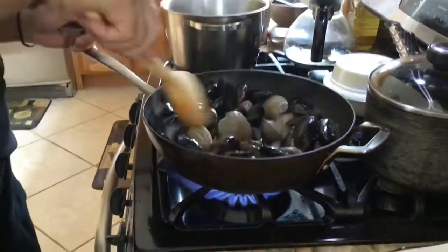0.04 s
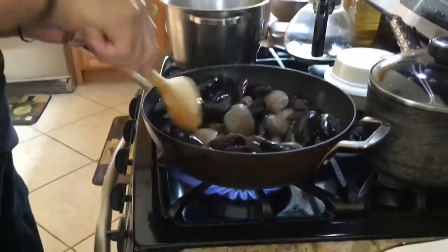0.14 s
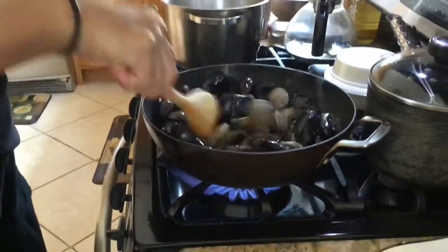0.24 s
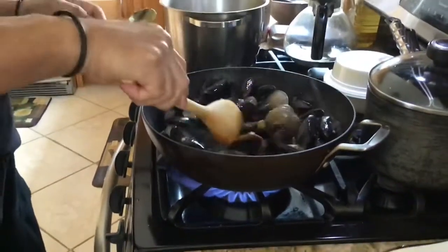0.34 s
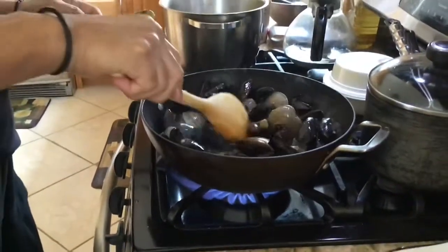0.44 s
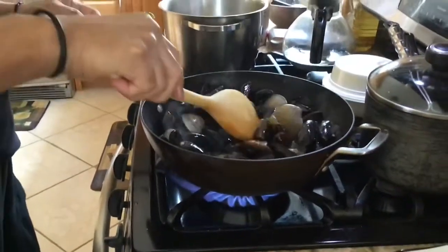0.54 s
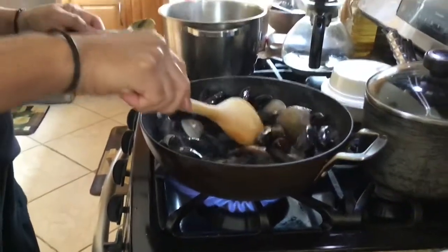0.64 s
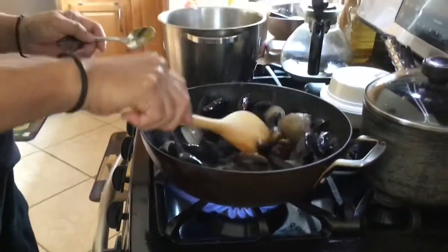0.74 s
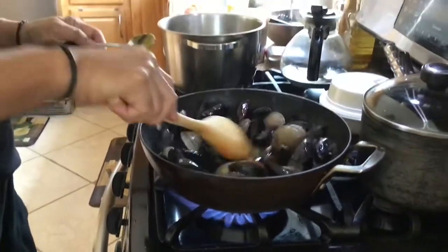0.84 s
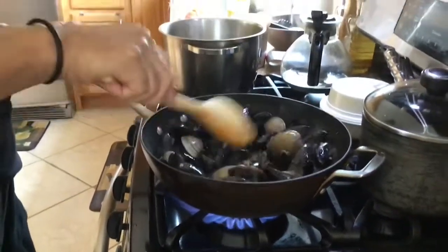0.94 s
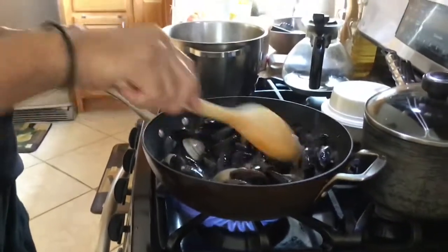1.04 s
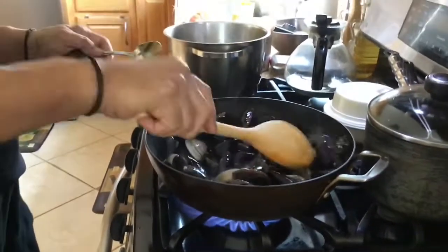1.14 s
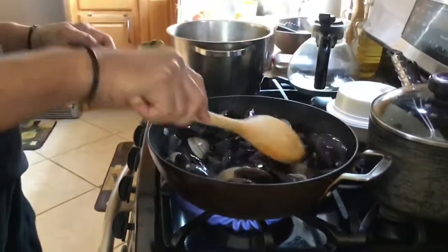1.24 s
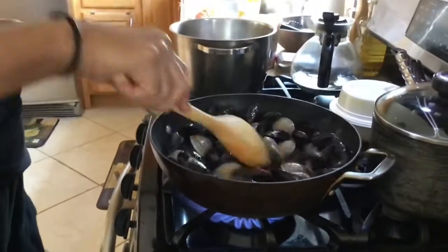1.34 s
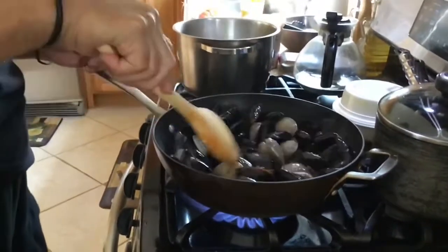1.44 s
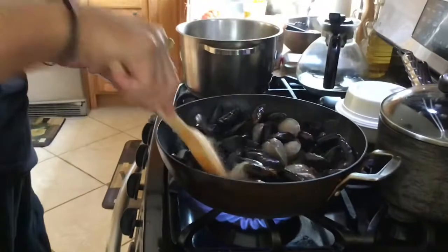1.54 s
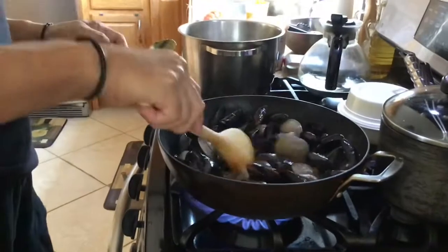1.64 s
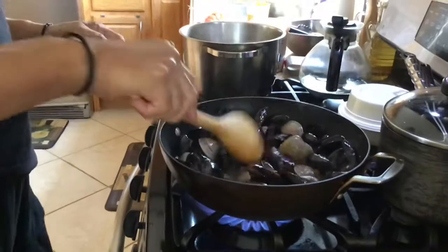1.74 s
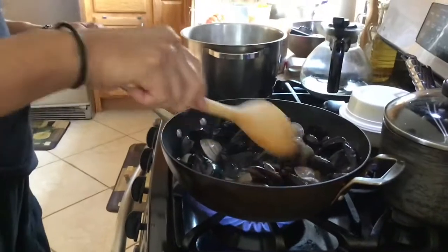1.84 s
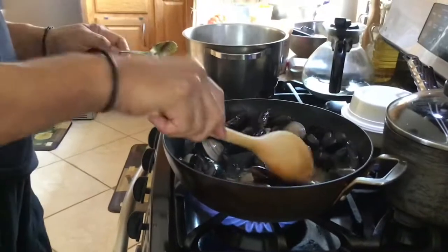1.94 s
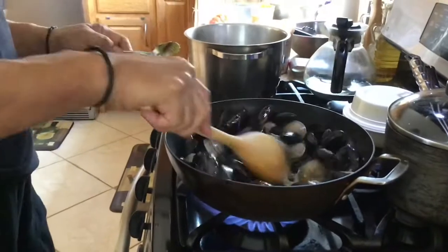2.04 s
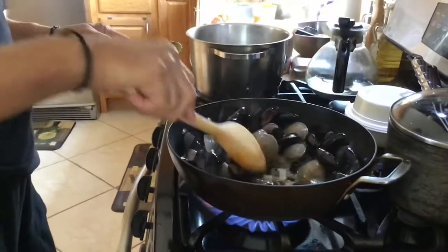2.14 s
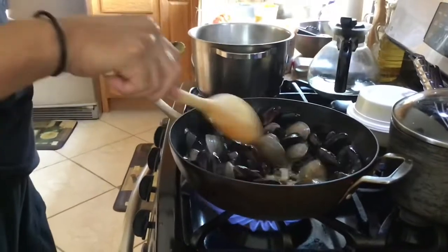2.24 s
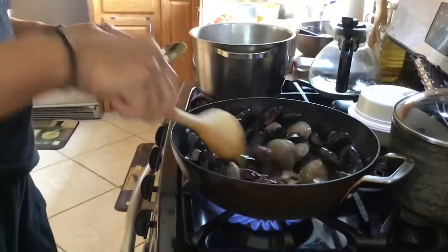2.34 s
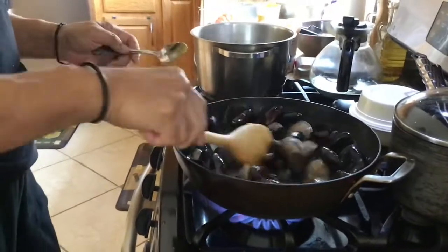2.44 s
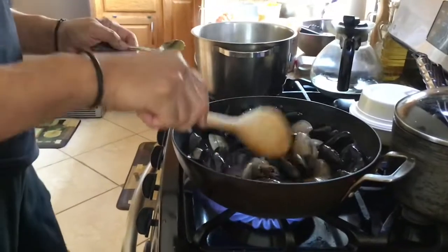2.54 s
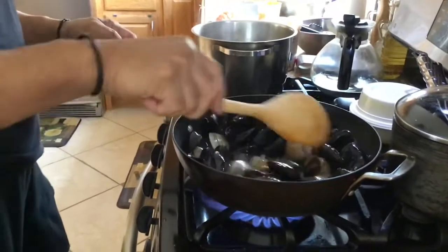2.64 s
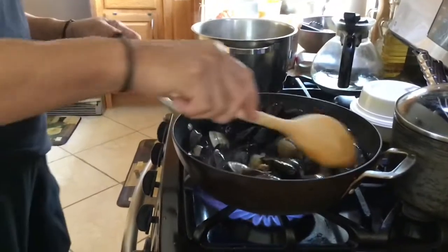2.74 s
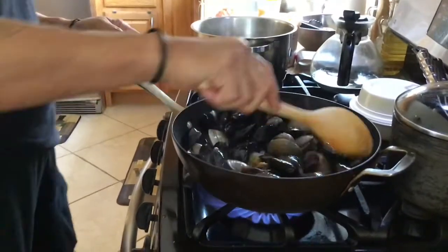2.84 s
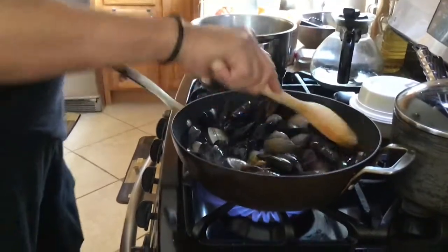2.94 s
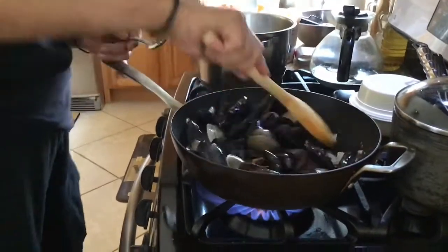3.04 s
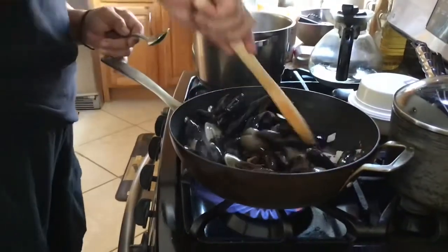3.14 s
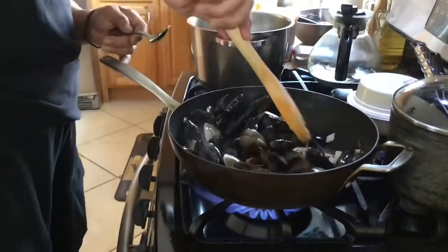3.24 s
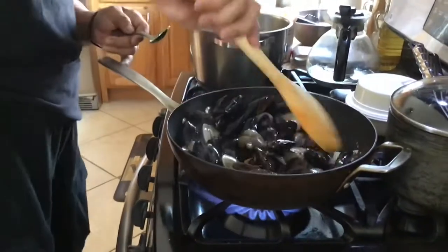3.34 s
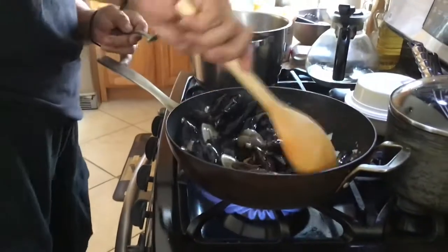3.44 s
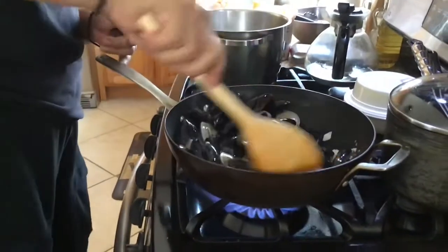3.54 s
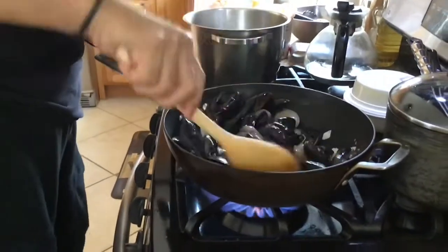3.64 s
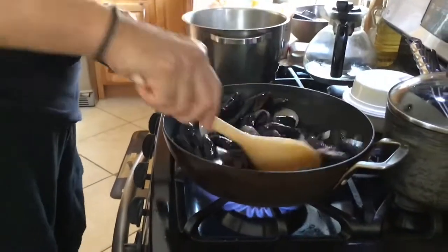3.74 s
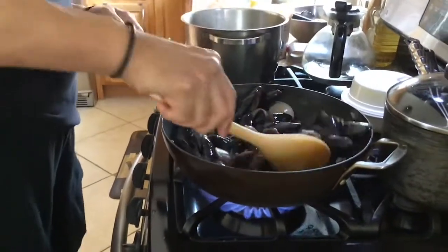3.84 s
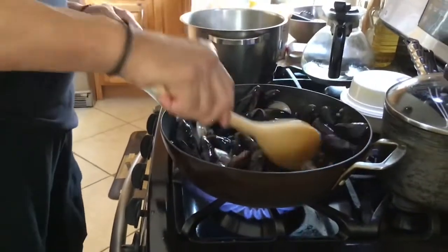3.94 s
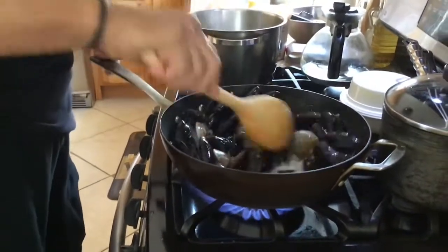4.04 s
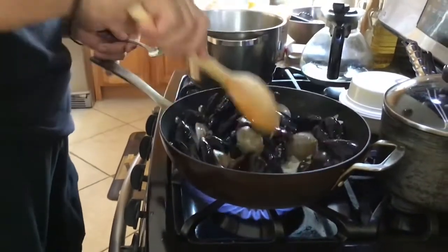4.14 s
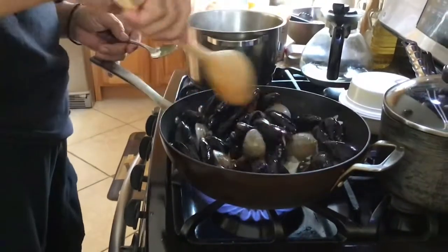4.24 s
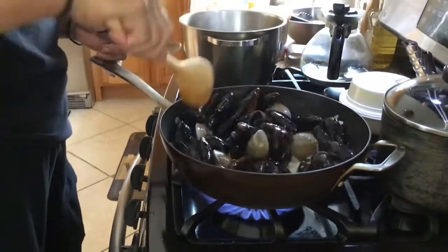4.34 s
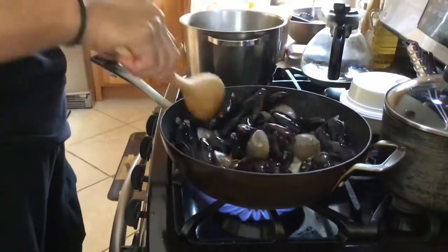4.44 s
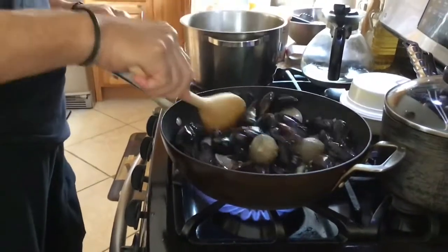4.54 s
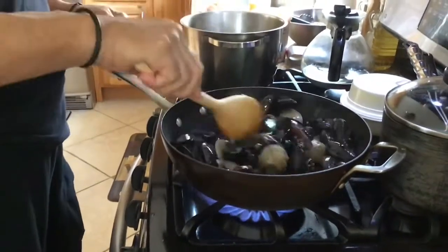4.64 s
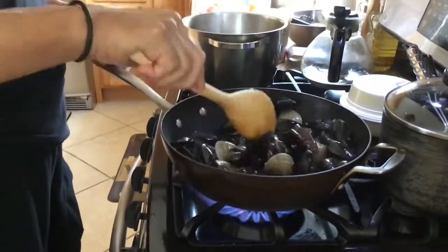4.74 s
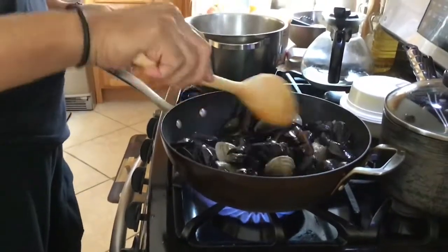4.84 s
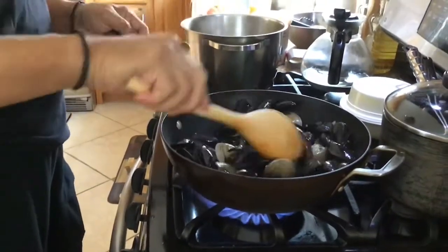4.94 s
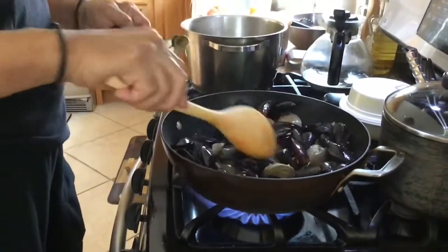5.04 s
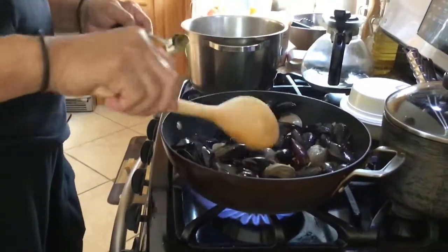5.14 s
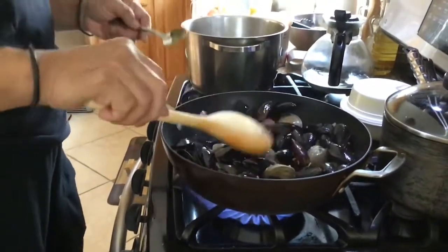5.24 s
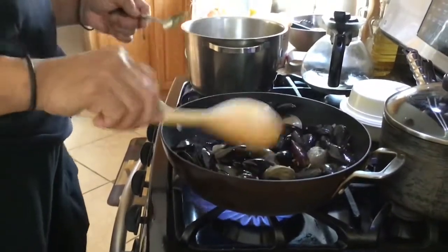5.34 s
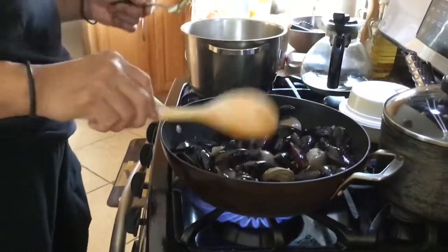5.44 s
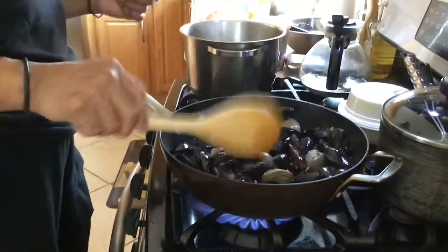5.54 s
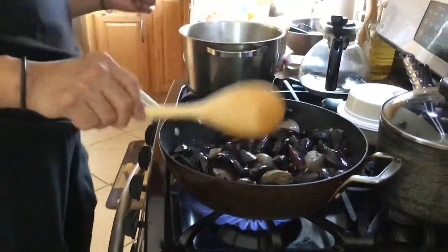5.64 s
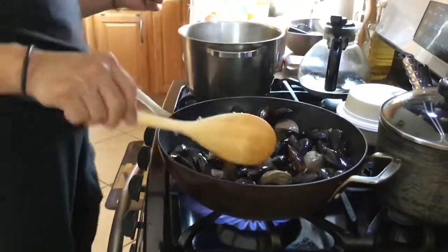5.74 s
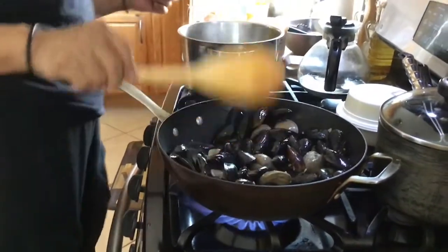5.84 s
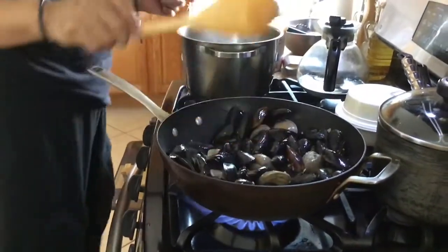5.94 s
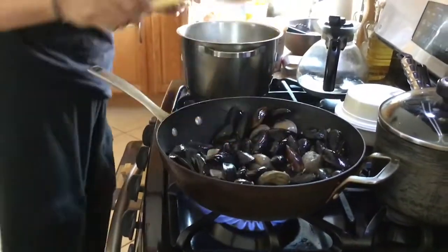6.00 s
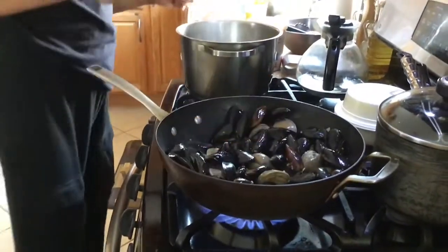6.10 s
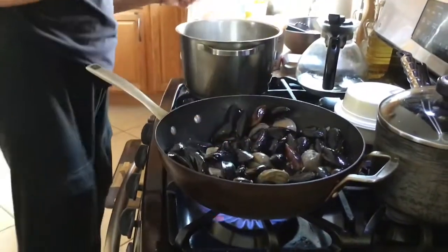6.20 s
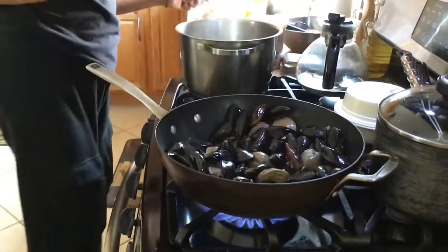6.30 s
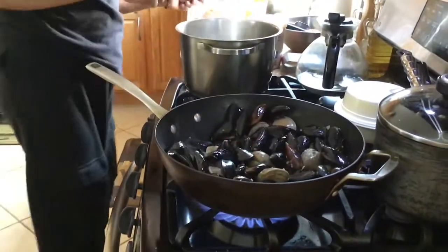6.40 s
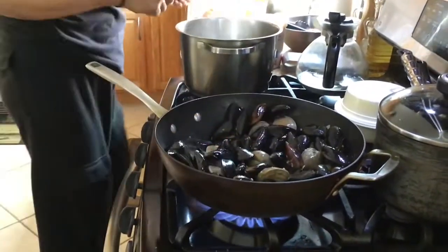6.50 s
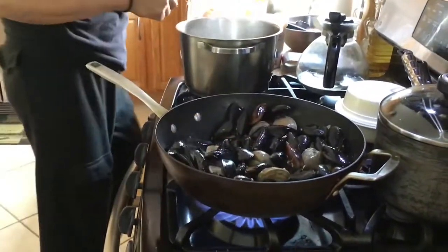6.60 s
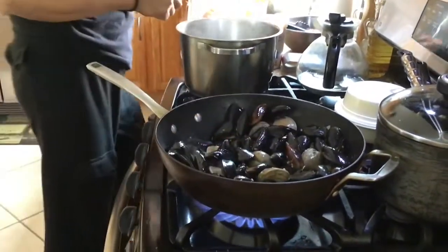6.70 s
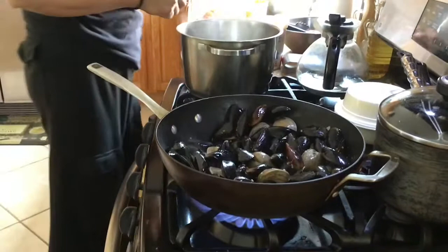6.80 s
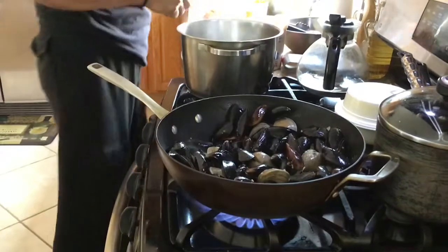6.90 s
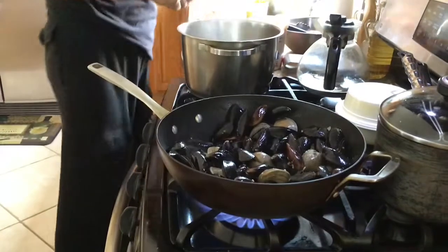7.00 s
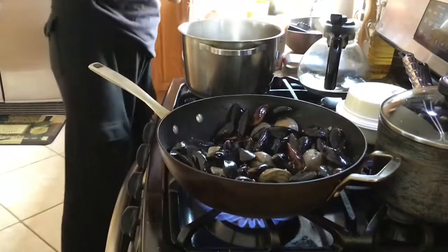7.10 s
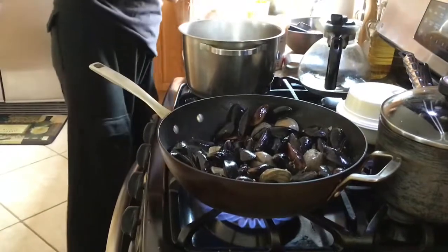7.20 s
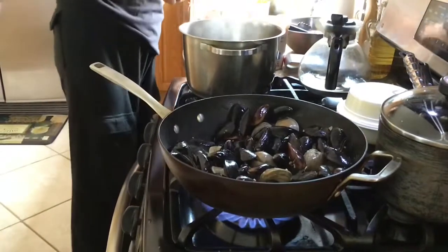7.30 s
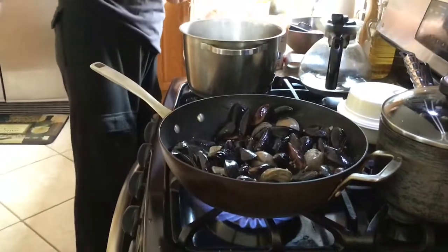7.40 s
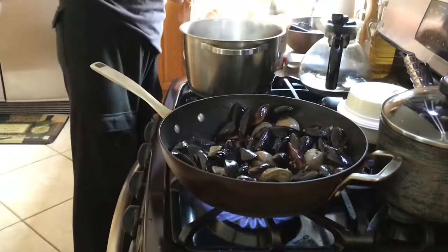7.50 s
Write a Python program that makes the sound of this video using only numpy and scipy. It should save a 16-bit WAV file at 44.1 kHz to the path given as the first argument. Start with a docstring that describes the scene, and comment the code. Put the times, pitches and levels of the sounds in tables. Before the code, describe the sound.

Shellfish are stirred in a deep skillet on a gas burner, heard close in mono in a small kitchen with a short echo. A fine, crackly sizzle, soft low flame rush and steady low hum last throughout. Stirring is already under way at 0 s: a busy clatter with a strong hollow pan knock near 0.2 s, brittle shell clicks and a dull thump, until about 0.4 s. Further strokes rattle the heap near 0.65, 1.05, 1.5, 1.9 and 2.3 s, with clear knocks at 1.1, 1.5 and 1.95. More scraping clatter comes around 2.9 and 3.5, then a lull, and strokes at 4.4 and 4.9. Sparser, sharper clacks follow at 5.1, 5.3 and 5.5, and a last hard clank at 5.7. The rattle dies away; from about 5.9 to 7.5 s only sizzle, flame and hum continue.

```python
"""Shellfish are stirred with a wooden spoon in a deep skillet on a gas burner, near a mono microphone.
From the start the juices sizzle (bursts of noise), the flame rushes (low noise) and an appliance hums
(steady tones). Over them, stroke by stroke, shells and spoon knock on the pan (ringing modes), shells click
on each other (short rings and splintery noise), the heap rattles (many small blows) and the pan thumps.
After a last hard knock the rattle dies away, and only sizzle, flame and hum go on."""
import sys
import numpy as np
from scipy import signal
from scipy.io import wavfile
from scipy.ndimage import uniform_filter1d

SR = 44100
rng = np.random.default_rng(int(sys.argv[2]) if len(sys.argv) > 2 else 0)


def wav_record(signal):
    """Record a signal, one row per channel, as 16-bit PCM in the file named by sys.argv[1]."""
    frames = np.transpose(np.atleast_2d(signal))
    bounded = np.clip(frames, -1, 1)
    # unit amplitude maps onto the largest positive 16-bit level
    quanta = np.round(bounded * 32767).astype(np.int16)
    wavfile.write(sys.argv[1], SR, quanta)


N = 333396  # length in samples

# upper ring of the skillet: (pitch [Hz], level [dB], time to fall by 60 dB [s])
UPPER_MODES = [(831, -9.5, 0.14), (905, -6.5, 0.029), (914, -6.5, 0.13), (947, -2, 0.063), (1073, -2, 0.08),
               (1094, -21, 0.2), (1149, 10.5, 0.036), (1233, -4.5, 0.018), (1468, -2.5, 0.056),
               (1580, -6, 0.058)]


def knocks():
    """Each blow rings the skillet, the upper ring first; then the heap settles back and damps it."""
    # shells or spoon on the pan: (time [s], peak of the low ring before damping [dB], pitch of the
    # struck spot [Hz], upper ring over the low ring [dB], damping, none if below 0 [dB])
    knock_rows = [(0.053, -20, 636, -5, 20), (0.082, -31, 606, 2, 2), (0.195, -6.5, 597, -5.5, 1.5),
                  (0.245, -27, 581, -16, 0), (0.28, -30, 651, -6, 5), (0.319, -28, 627, -4, 7),
                  (0.338, -19, 633, 5, 16), (0.37, -29.5, 576, 0, 5), (0.39, -24, 603, -6, 8),
                  (0.661, -31.5, 660, -3, 0), (0.743, -35.5, 644, 8, 0), (1.018, -30.5, 604, 3, 10),
                  (1.077, -11, 635, 0, 17), (1.109, -33, 563, 3, 5), (1.25, -28.5, 655, 5, 9),
                  (1.281, -22.5, 640, -13, 9), (1.505, -9.5, 594, -2, 2.5), (1.541, -24, 570, -8, -2),
                  (1.558, -27, 590, -10, 5), (1.885, -14.5, 700, -8, 23), (1.899, -25, 670, -8, 11),
                  (1.925, -17, 690, 0, 10), (1.962, -10.5, 565, -5, 1), (2.007, -20, 575, -4, 13),
                  (2.053, -26, 587, -15, 5), (2.082, -28.5, 549, -9, 8), (2.238, -29.5, 705, 2, -3),
                  (2.315, -27, 660, 4, 7), (2.328, -19, 606, -20, 6), (2.364, -24.5, 624, -8, -1),
                  (2.42, -31, 614, -13, 5), (2.535, -23, 664, -8, 5), (2.869, -31.5, 630, 6, 14),
                  (2.89, -24, 660, -15, 8), (2.944, -31.5, 657, 7, 5), (2.982, -23.5, 606, -21, -1),
                  (3.037, -22.5, 666, -8, 5), (3.4, -30.5, 643, 0, 0), (3.526, -22.5, 516, 3, 1),
                  (3.534, -20.5, 660, 0.5, 5), (3.584, -21.5, 624, 1, -0.5), (3.683, -29, 700, -1, 8),
                  (4.335, -41, 624, 11.5, 7), (4.414, -29.5, 644, 2, 0), (4.437, -18.5, 680, 0, 0.5),
                  (4.611, -22.5, 670, 0.5, 6), (4.851, -32, 660, -7, 13), (4.918, -30.5, 623, -2, -3),
                  (5.136, -29, 700, -1.5, 12), (5.3225, -16.5, 700, 2.5, 2), (5.501, -29.5, 649, -4, 0),
                  (5.68, -6, 603, -4, 19)]
    out = np.zeros(N)
    t = np.arange(SR // 3) / SR
    grip = 1 / (1 + np.exp((0.012 - t) / 0.0021))  # the heap grips after the first swell
    settled = (1 + t / 0.034) * grip  # then damps ever more
    for s, db, spot_hz, upper_db, damping_db in knock_rows:
        spot_db = 3 * rng.standard_normal((len(UPPER_MODES), 1))  # each blow wakes the modes differently
        upper = ring(UPPER_MODES, spot_db, gather_s=0.00297, rise_s=0.00053)
        rung = low_ring(spot_hz, focus_db=7.5) + gain_of(upper_db) * upper
        damped_db = db - max(damping_db, 0) * settled
        add(out, s - 0.0035, gain_of(damped_db) * rung)  # a little early, as the ring must swell
    return out


def low_ring(spot_hz, focus_db):
    """The low ring builds up slowly and favours modes near the struck spot's pitch."""
    # low ring of the skillet: (pitch [Hz], level [dB], time to fall by 60 dB [s])
    low_modes = [(484, -13, .12), (521, -10, .14), (545, -3, .2), (568, 0, .26), (588, -4, .18),
                 (606, -1, .24), (633, -3, .2), (648, 0, .28), (668, -1, .22), (683, -2, .22),
                 (719, -10, .1)]
    away = (np.array(low_modes)[:, :1] - spot_hz) / 100
    # focus_db is what a mode 100 Hz away loses
    return ring(low_modes, -focus_db * away ** 2, gather_s=0.00644, rise_s=0.0036)


def ring(modes, spot_db=0, gather_s=0, rise_s=0.00032, size=SR // 3):
    """Dying modes whose waves line up gather_s after the blow, so the ring swells and then beats apart."""
    hz, db, t60 = np.transpose(modes)[:, :, None]
    t = np.arange(size) / SR
    fading = gain_of(db + spot_db - 60 * t / t60)
    out = (fading * np.cos(2 * np.pi * hz * (t - gather_s))).sum(0)
    out *= 1 - np.exp(-(t / rise_s) ** 2)
    return out / abs(out).max()


def clicks():
    """Single shells snap against each other, each with a short bright burst."""
    # shell on shell: (time [s], level [dB], shell pitch [Hz], crack over the rest [dB], pitched share [0-1])
    click_rows = [(0.092, -19.5, 2330, -14, .4), (0.143, -22, 1650, -17, .3), (0.163, -18, 2380, -13, 0.37),
                  (0.1875, -22, 2830, -18, 0.47), (0.2086, -26, 2400, -15, 0.6),
                  (0.2618, -21, 1630, -17, 0.16), (0.3344, -17.5, 2880, -22, 0.55),
                  (0.3703, -20.5, 2330, -3, .5), (0.665, -27, 2500, -10, .3), (0.743, -24, 2380, -11, .3),
                  (1.025, -25, 2150, -15, .5), (1.0756, -14.5, 1580, -8.5, .2),
                  (1.1004, -28, 2150, -13, 0.6), (1.2414, -18, 2500, -24, .5),
                  (1.28, -19.5, 2280, -19, 0.33), (1.315, -27, 1520, -15, .3), (1.4491, -23, 2180, -17, .4),
                  (1.503, -16, 2340, -13, 0.44), (1.917, -23, 1660, -15, .4),
                  (1.9266, -20.5, 1900, 0.5, .1), (1.9565, -22, 1630, -25, .1), (1.985, -23, 1820, -25, .4),
                  (1.9962, -18, 1560, -19, 0.43), (2.2373, -26, 1600, -15, 0.3),
                  (2.761, -25, 2520, -16, .8), (2.846, -18, 2150, -12, 0.66),
                  (2.8667, -15.5, 2140, -9, 0.34), (2.9424, -21.5, 2470, -16, .5),
                  (2.9542, -21, 1770, -14, 0.53), (3.113, -25.5, 2400, -16, 0.7),
                  (3.1476, -27, 1590, -20, .7), (3.282, -27.5, 3210, -15, 0.7),
                  (3.5139, -22, 2220, -14, .3), (3.5246, -15.5, 2430, -20, 0.74),
                  (3.5336, -17, 2850, -18, 0.73), (3.802, -26, 2120, -14, .4), (4.023, -26, 1600, -15, 0.6),
                  (4.4134, -16, 2330, -17, 0.54), (4.435, -21.5, 3000, -10, .4),
                  (4.4646, -20.5, 2300, -15, 0.46), (4.597, -20, 2590, -16, 0.33),
                  (4.8519, -26, 1615, -20, .6), (4.8711, -21, 1620, -15, 0.5), (4.969, -26, 2300, -17, 0.5),
                  (5.002, -26, 1680, -18, 0.56), (5.1345, -17, 2290, -22, 0.65),
                  (5.3205, -10.5, 2490, -31, 0.78), (5.4986, -12.5, 2190, -30, .5),
                  (5.508, -16, 2250, -15, 0.35), (5.593, -20, 2010, -24, 0.56),
                  (5.6763, -7.5, 2580, -19, 0.4)]
    out = np.zeros(N)
    for s, db, hz, crack_db, pitched in click_rows:
        softness = 2.5 + max(-13.5 - db, 0) / 2.9  # quiet blows are softer
        hiss = rng.standard_normal(3000)
        click = shell(hz, 0.028, crack_db, pitched, softness, hiss)
        add(out, s - 0.001, gain_of(db) * click)
    return out


def shell(hz, t60, crack_db, pitched, softness, hiss):
    """A brittle burst of splintery noise round a short ring; soft blows wake fewer overtones."""
    # overtones of a shell: (multiple of its pitch, level for a softness of 1 [dB])
    overtones = [(1, 0), (1.32, -2), (1.66, -8), (1.97, -5)]
    t = np.arange(len(hiss)) / SR
    burst = hiss * gain_of(-60 * t / (1.75 * t60))
    rung = ring([(hz * k, softness * db, t60) for k, db in overtones], size=len(t))
    splinters = band(burst, 0.48 * hz, 1.905 * hz, order=2)
    crack = band(burst, 3500, 8000, order=1)
    return pitched * rung + (1 - pitched) * splinters + gain_of(crack_db) * crack


def thumps():
    """The pan rocks on its grate: a dull push of a few cycles and a scuff of low noise."""
    # thumps: (time [s], peak of the push [dB], pitch [Hz], scuff over the push [dB])
    thump_rows = [(0.11, -26, 118, -14), (0.189, -35, 267, 12), (1.081, -35.5, 129, 13),
                  (1.504, -35, 132, 9.5), (1.959, -33, 211, 8.5), (3.405, -38.5, 167, 12),
                  (3.527, -39, 135, 10), (3.582, -35, 153, 8.5), (3.735, -39, 115, 10),
                  (4.428, -38, 117, 12.5), (5.316, -41.5, 125, 13.5), (5.68, -32, 194, 10.5)]
    out, t = np.zeros(N), np.arange(6000) / SR
    for s, db, hz, scuff_db in thump_rows:
        push = ring([(hz, 0, 0.09)], gather_s=0.00423, rise_s=0.0033)[:len(t)]
        fading_noise = rng.standard_normal(len(t)) * gain_of(-60 * t / 0.2)
        scuff = band(fading_noise, 205, 660, order=1)
        add(out, s, gain_of(db) * (push + gain_of(scuff_db) * scuff))
    return out


def stirring():
    """The heap slides: small knocks on the pan and a dense rattle of shells of every size."""
    # a focus of 0 lets all low modes ring alike
    rumble = skillet_rung_by(taps(300, 2.25), spot_hz=615, focus_db=0, upper_db=1.0)
    rattle = np.zeros(N)
    for hz in np.geomspace(1400, 3600, 12):  # big shells to small ones
        one_shell = shell(hz, 0.027, -16.0, 0.28, 3.5, rng.standard_normal(2000))
        rattle += signal.oaconvolve(taps(90, 3.7), one_shell)[:N]
    # between strokes the spoon only nudges the heap, at the resting levels
    return rumble * strokes(rest_db=-52.5, column=2) + evened(rattle) * strokes(rest_db=-55.5, column=3)


def strokes(rest_db, column):
    """Loudness of the sliding heap: it starts fast, holds while pushed and slides slowly to rest."""
    # spoon strokes: (start [s], length of the push [s], rumble on the pan [dB], rattle of shells [dB])
    stroke_rows = [(0.0, .3, -37, -42), (0.644, 0.14, -42.5, -46.5), (1.036, 0.31, -43, -42.5),
                   (1.512, 0.045, -42, -41), (1.85, 0.18, -42, -40.5), (2.25, 0.19, -41.5, -43.5),
                   (2.864, 0.15, -38, -42.5), (3.504, 0.24, -39, -43.5), (4.33, 0.24, -42.5, -42.5),
                   (4.862, 0.12, -46, -48)]
    rise_db_per_s, settle_db_per_s, spoon_out_s = 162, 58, 5.9
    t, rows = np.arange(N) / SR, np.array(stroke_rows)[:, :, None]
    start, push = rows[:, 0], rows[:, 1]
    early = np.maximum(start - t, 0)
    late = np.maximum(t - start - push, 0)
    level_db = rows[:, column] - rise_db_per_s * early - settle_db_per_s * late
    power = gain_of(2 * level_db).sum(0)  # twice the dB gives power
    nudges = gain_of(2 * rest_db) * (t < spoon_out_s)  # until the spoon is lifted out
    return np.sqrt(power + nudges)


def skillet_rung_by(blows, spot_hz, focus_db, upper_db):
    """Many small blows each set off the skillet's ring."""
    body = low_ring(spot_hz, focus_db) + gain_of(upper_db) * ring(UPPER_MODES, gather_s=0.002996)
    return evened(signal.oaconvolve(blows, body)[:N])


def taps(per_s, spread_db):
    """Clicks at random moments, a few of them large."""
    size, sign = rng.exponential(1, N), rng.choice([-1., 1.], N)
    happens = rng.random(N) < per_s / SR
    return happens * sign * gain_of(spread_db * np.minimum(size, 5))


def sizzle():
    """Countless tiny bubbles burst into a hiss, a few larger ones tick, and all keep the skillet ringing."""
    # loudness of the hiss: (time [s], level [dB])
    sizzle_levels = [(0.0, -41), (0.5, -40), (1.32, -41), (2.02, -40.5), (2.9, -40.5), (4.3, -42),
                     (7.56, -42.5)]
    # colour of the hiss: (frequency [Hz], relative level per Hz [dB])
    sizzle_colour = [(760, -14), (1300, -2.5), (2190, -2.5), (2380, 3.5), (3650, 0), (4420, 1.5),
                     (4810, 3.5), (5880, -9), (10700, -8), (11900, -12.5), (15500, -11.5), (16000, -6),
                     (16500, -43)]
    # the skillet colours it: (frequency [Hz], width [Hz], boost [dB])
    sizzle_peaks = [(1753, 39, 10), (2216, 245, 4), (3140, 67, 5), (3560, 90, 4.5), (4660, 410, -4),
                    (5560, 100, 2), (6340, 700, 6.5), (8660, 960, 3)]

    def shape_db(hz):
        bumps = sum(db * np.exp(-((hz - f) / w) ** 2) for f, w, db in sizzle_peaks)
        return read(sizzle_colour, hz) + bumps

    ticks = uniform_filter1d(abs(taps(170, 1.9)), size=60) * 60  # each tick lasts 60 samples
    hiss = evened(noise(shape_db, patchy_db=1.16, size=512) * (1 + 0.086 * ticks))
    # bubbles keep the middle of the skillet ringing faintly
    simmer = skillet_rung_by(taps(900, 0.62), spot_hz=642, focus_db=67, upper_db=5.0)
    return gain_of(along(sizzle_levels)) * hiss + gain_of(-50.5) * simmer


def burner():
    """The rush of the gas flame is low noise in drifting patches."""
    # colour of the flame: (frequency [Hz], relative level per Hz [dB])
    flame_colour = [(15, -58), (25, -53), (64, -5.5), (90, -7), (119, -10), (141, 0), (173, -3.5),
                    (285, -4.5), (437, -9.5), (626, -2), (769, -15), (1120, -15.5), (1500, -42),
                    (1950, -47), (3300, -120)]
    return gain_of(-46) * noise(lambda hz: read(flame_colour, hz), patchy_db=1.73, size=4096)


def hum():
    """Steady mains-driven tones of an appliance, wavering a little in loudness."""
    # tones: (pitch [Hz], rms level [dB])
    tones = [(119.8, -45.5), (143, -58.5)]
    t = np.arange(N) / SR
    waver = np.zeros(N)
    for f in np.geomspace(0.3, 5, 20):  # slow sways, the slowest strongest
        waver += np.sin(2 * np.pi * (f * t + rng.random())) / np.sqrt(f)
    waver_db = 0.2 * evened(waver)
    # a sine's peak is sqrt(2) times its rms
    return sum(np.sqrt(2) * gain_of(db + waver_db) * np.sin(2 * np.pi * hz * t) for hz, db in tones)


def kitchen(x):
    """The room answers with sparse echoes of random sign, each band dying at its own speed."""
    # echo decay: (frequency [Hz], time to fall by 60 dB [s])
    room_decay = [(200, 0.23), (600, 0.24), (1400, 0.28), (3700, 0.21), (9000, 0.058)]
    echoes = np.zeros(SR // 2)
    at = np.arange(300, len(echoes) - 20, 20)  # one echo in every 20 samples
    echoes[at + rng.integers(0, 20, len(at))] = rng.choice([-1., 1.], len(at))
    hz, t, z = signal.stft(echoes, SR, nperseg=256)
    fading = gain_of(-60 * t / read(room_decay, hz)[:, None])
    tail = signal.istft(z * fading, SR, nperseg=256)[1]
    return signal.fftconvolve(x, tail / np.linalg.norm(tail))[:N]


def noise(shape_db, patchy_db, size=1024):
    """Random short-time spectra of a given shape, louder and softer in drifting patches."""
    hz = np.fft.rfftfreq(size, 1 / SR)
    a, b, patches = rng.standard_normal((4 * N // size + 5, len(hz), 3)).T
    patches = uniform_filter1d(patches, size=14, axis=0)  # smooth over frequency
    patches = evened(uniform_filter1d(patches, size=10, axis=1))  # and over time
    z = (a + 1j * b) * gain_of(shape_db(hz)[:, None] + patchy_db * patches)
    return evened(signal.istft(z, nperseg=size, noverlap=3 * size // 4)[1][:N])


def band(x, lo_hz, hi_hz, order):
    """Band-pass, steeper with a higher order, scaled to peak 1."""
    sos = signal.butter(order, [lo_hz, hi_hz], "band", fs=SR, output="sos")
    out = signal.sosfilt(sos, x)
    return out / abs(out).max()


def gain_of(db):
    """Decibels to a factor."""
    return 10 ** (np.asarray(db) / 20)


def evened(x):
    """Scaled to rms 1."""
    return x / np.sqrt(np.mean(x ** 2) + 1e-20)


def read(points, hz):
    """A table over frequency, read at hz on a log scale."""
    f, value = np.transpose(points)
    return np.interp(np.log(hz + 1), np.log(f + 1), value)


def along(rows):
    """A curve of (time, value) rows at every sample."""
    times, values = np.transpose(rows)
    return np.interp(np.arange(N) / SR, times, values)


def add(mix, s, sound):
    """Lays a sound into the mix at s seconds."""
    part = mix[max(round(s * SR), 0):][:len(sound)]
    part += sound[:len(part)]


def scene():
    """Blows with their echoes over the steady sounds, alike in both channels."""
    hits = knocks() + clicks() + thumps()
    echoes = gain_of(-12) * kitchen(hits)
    mix = hits + echoes + stirring() + sizzle() + burner() + hum()
    return np.array([mix, mix])


def record(dry):
    """The microphone loses the deepest bass; then the recorder's band limit cuts the highest treble."""
    thin = signal.sosfilt(signal.butter(2, 48, "high", fs=SR, output="sos"), dry)
    edge_hz = 15750
    limit = signal.firwin(1023, edge_hz, window=("kaiser", 9), fs=SR)
    return signal.oaconvolve(thin, limit[None], "same")


dry = scene()
out = record(dry)
wav_record(out)
```